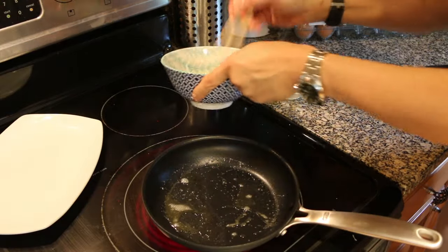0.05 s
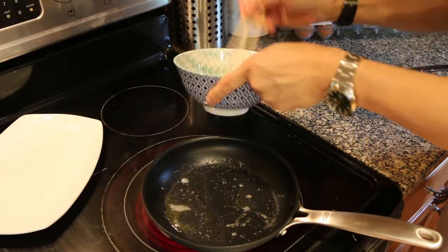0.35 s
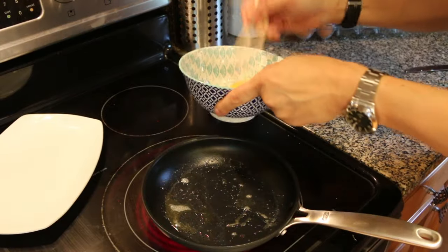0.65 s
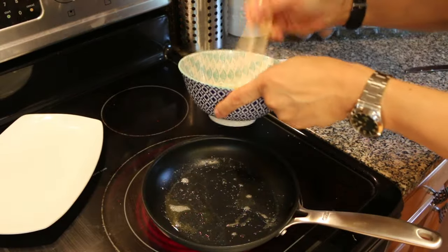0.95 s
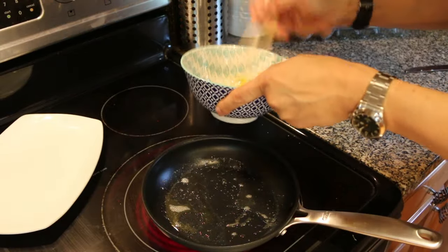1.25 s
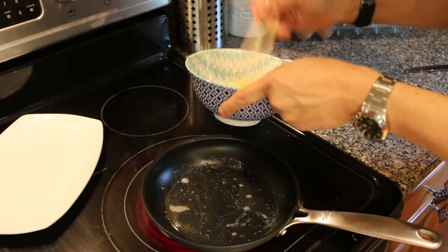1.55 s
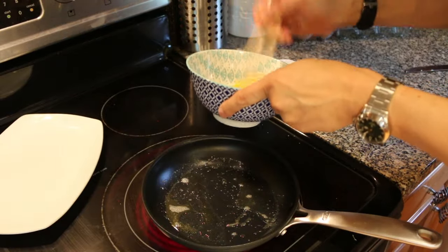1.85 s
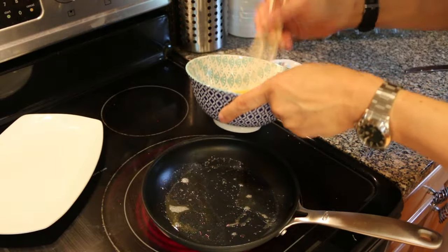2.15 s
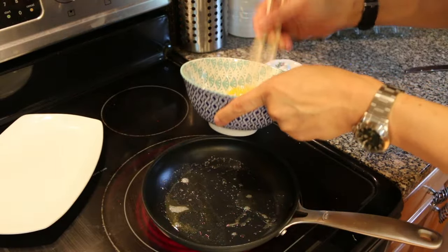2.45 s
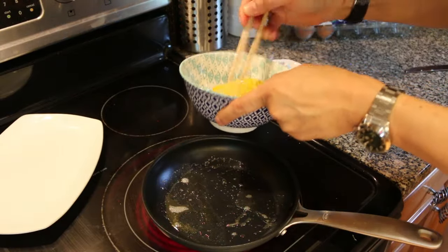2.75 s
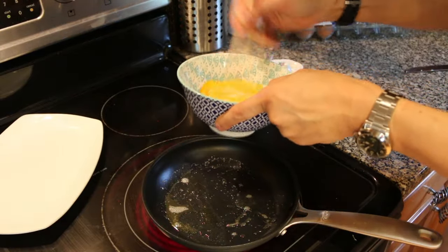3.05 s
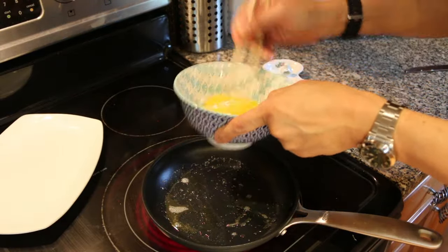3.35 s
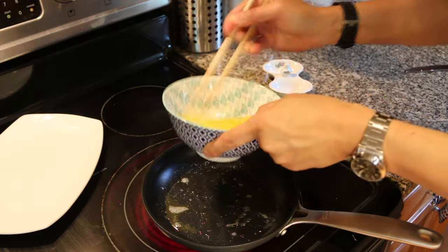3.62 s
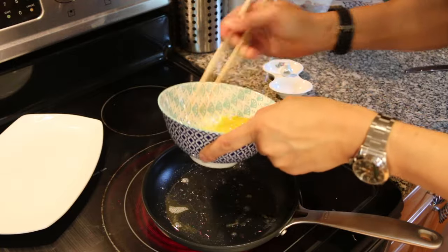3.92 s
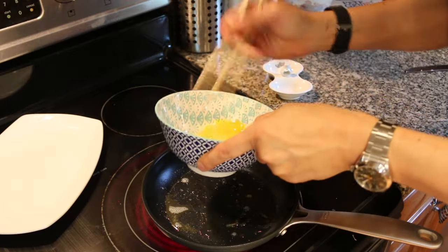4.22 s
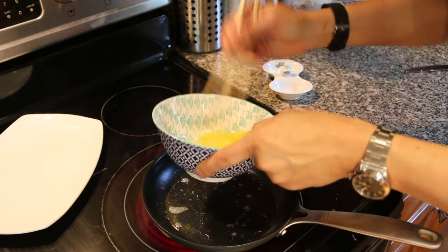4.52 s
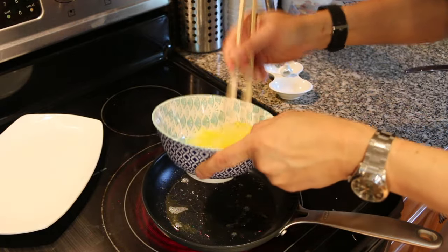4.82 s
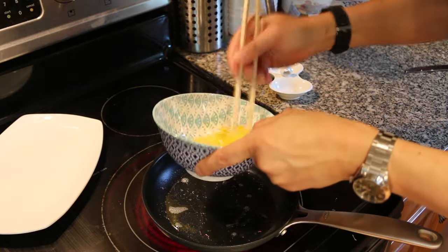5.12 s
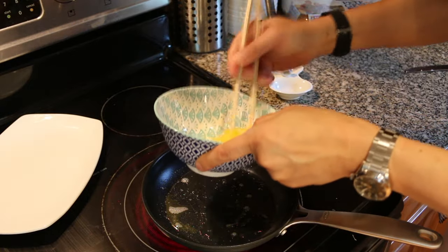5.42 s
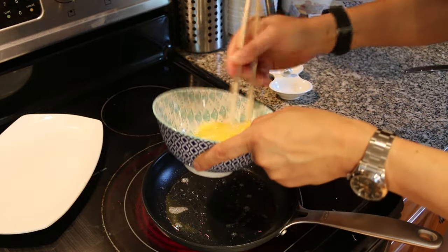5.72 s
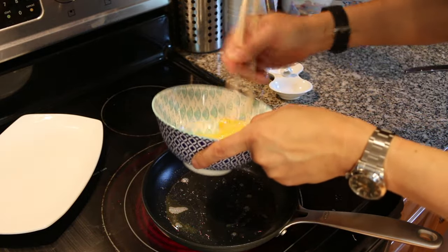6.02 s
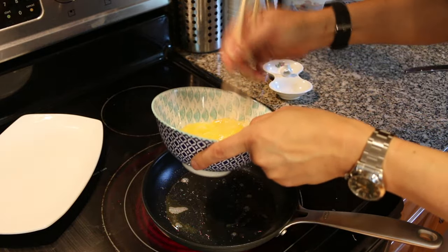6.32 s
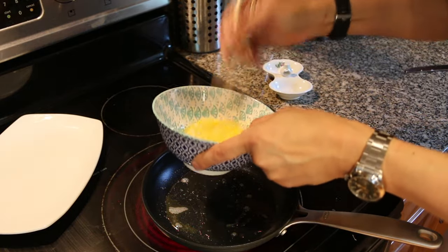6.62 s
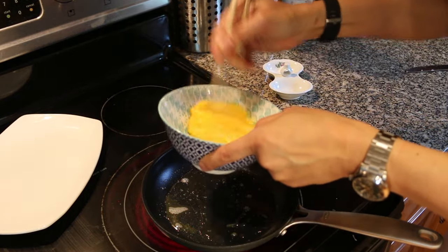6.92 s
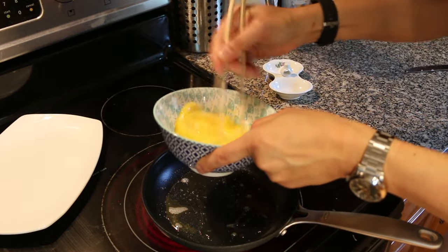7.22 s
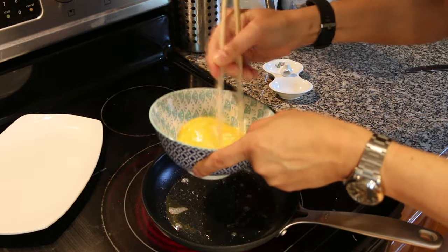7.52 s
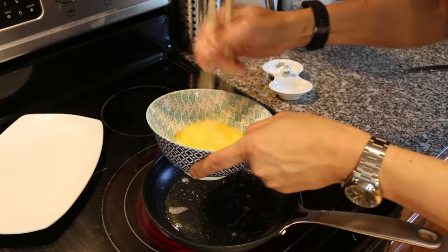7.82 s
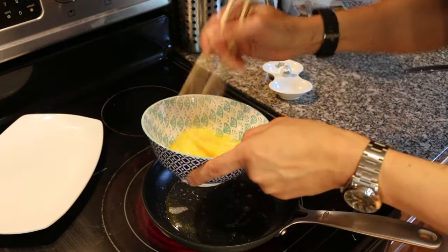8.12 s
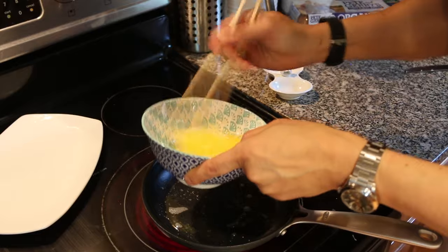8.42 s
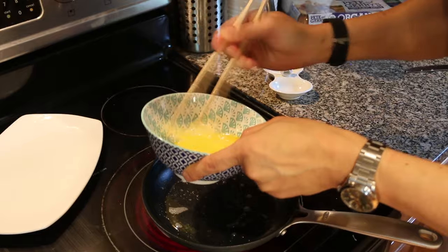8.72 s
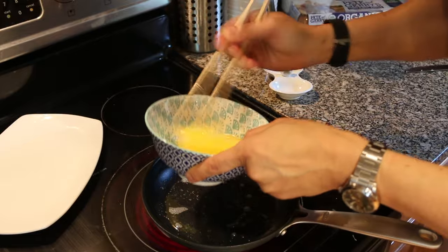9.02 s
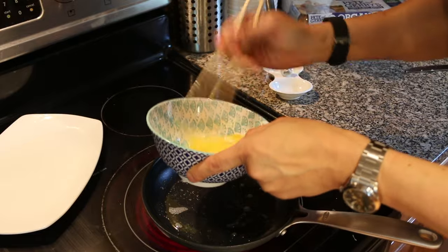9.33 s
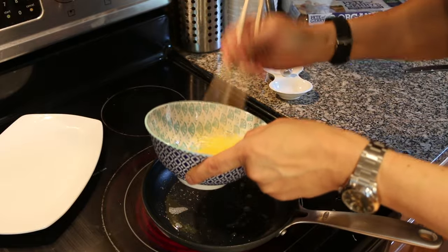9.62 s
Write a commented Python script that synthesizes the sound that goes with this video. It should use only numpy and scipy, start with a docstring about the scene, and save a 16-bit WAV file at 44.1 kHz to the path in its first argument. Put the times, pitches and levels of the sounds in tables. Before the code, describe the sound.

Rapid clacking of chopsticks whisking eggs in a ceramic bowl, easing off twice into softer wet sloshes and scrapes.

```python
"""Beating eggs with chopsticks

Wooden chopsticks beat eggs in a hand-held ceramic bowl over a stove, about 6.5 strokes a second.
Most strokes clack on the bowl and set it ringing; in between, the egg sloshes, air pockets plop,
and now and then the sticks scrape the glaze or click together. Stove and kitchen walls throw
the sound back over a low rush of air, and a limiter rides the clacks."""
import sys
import numpy as np
from scipy import signal
from scipy.fft import rfft, irfft
from scipy.io import wavfile
from scipy.ndimage import uniform_filter1d

SR = 44100
rng = np.random.default_rng(int(sys.argv[2]) if len(sys.argv) > 2 else 0)


def to_wav(sig):
    """Store sig (one row per channel, or 1-D mono) as 16-bit WAV at the path in sys.argv[1].

    Samples outside -1..1 are clipped; the rate is SR.
    """
    pcm = np.clip(np.atleast_2d(sig), -1, 1) * 32767
    pcm = np.round(pcm).astype(np.int16)
    wavfile.write(sys.argv[1], SR, pcm.T)  # frames by channels


N = 434826

# chopsticks hit the bowl: t/s, crack level/dB, bowl ring level/dB, top-edge tilt/(dB per octave)
BOWL_HITS = [(0.0253, -2, -37, -7), (0.1738, 2, -28, -5), (0.32, 4.5, -22, -4), (0.4796, 2.5, -15, 0.5),
             (0.634, 2, -17.5, -6), (0.7775, -1.5, -23, 1.2), (0.9262, 1, -15.5, -5),
             (1.076, -1.2, -19.5, 1.5), (1.2235, 1.5, -15, -8.5), (1.3729, -0.2, -19, -3.3),
             (1.5276, 1.0, -30, -5.5), (1.6283, -14, -26, -6.2), (1.649, -14, -25, -10.1),
             (1.6777, 1.5, -31, -3.5), (1.8305, -1, -22.5, -4.5), (1.9802, -1.7, -20, -5),
             (2.06, -13, -25, -11), (2.139, 2, -19, -5), (2.2917, -2, -13, -3), (2.4436, 2.5, -12, -2),
             (2.593, 4.5, -14, -4), (2.7438, -7, -29, -1.5), (2.8378, -24, -24.5, -24),
             (3.04, -18, -33, 11), (3.105, -16.5, -30, -13), (3.214, -21.5, -26.5, -9.0),
             (3.5572, -1, -20.5, -3), (3.708, 1.8, -16.5, 1), (3.8677, -2.5, -18.5, -1.5),
             (4.0139, -4.2, -21, -3.5), (4.1748, -1, -14, -3), (4.331, 3, -10.5, -2),
             (4.4876, 2, -18.3, 1.5), (4.6471, -3, -22, 1), (4.817, -2.2, -21, -3.4),
             (4.9666, 3, -8.5, -1.2), (5.1212, 2.2, -17.5, 6), (5.2739, 2.3, -14.5, 2),
             (5.433, 1, -12.5, 0.5), (5.5899, 1.5, -14.5, 0.8), (5.7443, 4.5, -10, -0.5),
             (5.8969, -0.8, -15.5, 1), (6.052, 1.3, -13.5, 1), (6.207, 4, -10, 3), (6.3682, 3, -15.4, -4.5),
             (6.5253, -0.3, -7.5, 0), (6.6846, 3, -14, 0), (6.8368, -8, -14.5, -9),
             (7.1152, -16.5, -15.5, -20), (7.287, -18, -24.7, -15), (7.4132, -18, -25.5, -9.8),
             (7.6258, -14, -22, -1), (8.1982, -12.5, -38, 1), (8.3771, -3.9, -18.5, -0.0),
             (8.535, 0.9, -18, -3.5), (8.6855, -3.5, -13.5, -3.5), (8.8263, -3, -18.5, 0),
             (8.985, -0.3, -11, -0.5), (9.1296, 3, -10, 0), (9.2881, 3, -13, -0.5),
             (9.446, 2.2, -11.5, -4.5), (9.599, 5.5, -7.5, -0.5), (9.7573, 1, -13.5, -8)]
# how hard the egg is churned: t/s, low slosh level/dB, wet fizz level/dB
EGG_CHURN = [(0.0, -49, -36), (1.1, -37, -34.5), (2.44, -41.5, -32.5), (3.51, -41, -42.5), (4.03, -34, -38),
             (4.58, -39.5, -37.5), (6.2, -32.5, -43.5), (6.67, -39.5, -33.5), (7.11, -34, -38),
             (7.91, -33, -32.5), (8.27, -39.5, -41), (8.59, -32.5, -39), (8.81, -36, -38),
             (9.86, -34.5, -35.5)]
# tone of wood dragging on wet glaze and of the egg's sticky crackle: f/Hz, level/dB
STICKY_SPECTRUM = [(400, -34), (1500, 2), (3500, 3.5), (7000, 2.5), (9500, -1.5), (13000, -7), (16000, -25)]


def amp(db):
    """Decibels to gain."""
    return 10 ** (np.asarray(db) / 20)


def unit_rms(x):
    """Scales to rms 1."""
    return x / np.sqrt(np.mean(x ** 2) + 1e-20)


def curve_at(points, hz):
    """Reads a curve on a log-frequency axis."""
    f, value = np.transpose(points)
    return np.interp(np.log(hz + 1), np.log(f + 1), value)


def add(mix, s, sound):
    """Mixes a sound in at time s."""
    part = mix[max(round(s * SR), 0):][:len(sound)]
    part += sound[:len(part)]


def decay(t, t60):
    """Exponential decay, 60 dB down after t60."""
    return np.exp(-np.log(1000) * t / np.maximum(t60, 1e-4))


def colour(x, spectrum, size=2048):
    """Minimum-phase EQ of unit energy with the given spectrum."""
    log_gain = np.log(amp(curve_at(spectrum, abs(np.fft.fftfreq(size, 1 / SR)))))
    taps = np.fft.ifft(np.exp(np.conj(signal.hilbert(log_gain)))).real[:size // 2]
    return signal.fftconvolve(x, taps / np.linalg.norm(taps))[:len(x)]


def air(level_db=-48):
    """Room tone: the steady low rush of the kitchen."""
    # the quiet kitchen: f/Hz, level/dB
    air_spectrum = [(15, -3.5), (40, -2), (70, -7), (130, -10), (300, -10.5), (600, -12.5), (1500, -63),
                    (5000, -21.5), (16000, -30.5)]
    gain = amp(curve_at(air_spectrum, np.fft.rfftfreq(N, 1 / SR)))
    return amp(level_db) * unit_rms(irfft(rfft(rng.standard_normal(N)) * gain, N))


def room_tail(build_s=0.0009, far_wall_s=0.08, far_wall_gain=0.68, far_wall_width_s=0.025):
    """Diffuse ring of the kitchen, with a second swell from the far wall."""
    # tone of the reverb: f/Hz, level/dB
    tail_spectrum = [(200, 8), (800, 5.5), (2000, 7.5), (4000, -0.5), (7500, -3.5), (9500, -4),
                     (16000, -5.5)]
    # decay of the reverb: f/Hz, t60/s
    tail_t60 = [(200, 0.77), (1500, 0.24), (6000, 0.37), (10000, 0.3), (16000, 0.22)]
    hz, t, bands = signal.stft(rng.standard_normal(SR // 2), SR, nperseg=256)
    far_wall = far_wall_gain * np.exp(-((t - far_wall_s) / far_wall_width_s) ** 2)
    swell = 1 - np.exp(-t / build_s) + far_wall
    tone = amp(curve_at(tail_spectrum, hz))[:, None]
    fade = decay(t, curve_at(tail_t60, hz)[:, None])
    tail = signal.istft(bands * tone * fade * swell, SR, nperseg=256)[1]
    return tail / np.linalg.norm(tail)


def kitchen(x, near_db=-0.5, near_hz=3200, tail_db=-6, sway_s=0.00022, tails=3):
    """Dull early echoes, then the room rings on. The paths shift as the bowl sways."""
    # echoes off the stove top, its back panel and the wall: delay/s, gain
    echoes = [(.0014, 1), (.0037, 0.48), (.0051, 0.74), (.0073, 0.13), (.0078, 0.11), (.0084, 0.32),
              (0.0104, -0.21), (0.0141, -0.38)]
    t = np.arange(N) / SR
    dull = signal.lfilter(*signal.butter(1, near_hz, fs=SR), x)
    knots = np.arange(0, t[-1] + 1, 1 / 4)
    near, tail = np.zeros((2, N))
    for delay, gain in echoes:
        sway = sway_s * np.interp(t, knots, rng.standard_normal(len(knots)))
        near += gain * np.interp(t - delay - sway, t, dull)
    for k in range(tails):
        crossfade = np.sqrt(2 / tails) * np.cos(np.pi * (2 * t + k / tails))
        tail += signal.fftconvolve(x * crossfade, room_tail())[:N]
    return x + amp(near_db) * near + amp(tail_db) * tail


def nook(x, level_db=-1.0, width_hz=9.6):
    """The tight space between bowl, pan and stove sings on at a few pitches."""
    # its narrow resonances: f/Hz, level/dB
    resonances = [(812, -15.5), (857, 2), (1031, 4), (1190, 5.5), (1298, -27), (1339, -22.5), (1555, -6),
                  (1940, -42), (2121, -7), (2728, 3)]
    return x + sum(amp(db + level_db) * signal.lfilter(*signal.iirpeak(hz, hz / width_hz, fs=SR), x)
                   for hz, db in resonances)


def bubble(hz, t60, glide, swell_cycles=0.7):
    """An air pocket swells into a note that bends as it nears the surface."""
    t = np.arange(SR // 8) / SR
    pitch = hz * (1 + glide * (1 - np.exp(-t / 0.034)))
    attack = 1 - np.exp(-t * hz / swell_cycles)
    return np.sin(2 * np.pi * np.cumsum(pitch) / SR) * decay(t, t60) * attack


def froth(spectrum, per_s, cycles, spread_db, pitches=44):
    """A crowd of tiny, heavily damped bubbles of all sizes."""
    notes = []
    for hz in np.geomspace(350, 9000, pitches):
        note = bubble(hz, t60=cycles / hz, glide=0.042 * rng.standard_normal())
        notes.append(amp(curve_at(spectrum, hz)) * hz * note[:SR // 20])
    gains = amp(spread_db * np.minimum(rng.exponential(1, N), 3))
    out, pick = np.zeros(N), rng.integers(0, pitches, N)
    for at in np.flatnonzero(rng.random(N) < per_s / SR):
        add(out, at / SR, gains[at] * notes[pick[at]])
    return unit_rms(out)


def sticky_crackle(per_s=120, spread_db=5):
    """Threads and films of egg white snap."""
    snaps = amp(spread_db * np.minimum(rng.exponential(1, N), 3)) * rng.choice([-1, 1], N)
    return unit_rms(colour(snaps * (rng.random(N) < per_s / SR), STICKY_SPECTRUM))


def slosh(slosh_db=-6, fizz_db=-9, sticky_db=-4, full_stroke_db=-10, swing_db=3, swing_hz=7.24):
    """On each stroke the sticks swish through the egg, and the egg flops back a moment later."""
    # low body of the moving egg: f/Hz, level/dB
    slosh_spectrum = [(150, -44), (400, -8.5), (650, -14.5), (850, -2), (1300, 2), (2000, -4.5),
                      (3500, -9.5), (9000, -26)]
    # wet fizz of its finest bubbles: f/Hz, level/dB
    fizz_spectrum = [(500, -44), (1400, -24), (2100, -0.5), (3000, -11.5), (4200, -9), (5500, -7.5),
                     (8000, -12), (10000, -23)]
    t = np.arange(N) / SR
    strokes = np.array([s for s, db, *_ in BOWL_HITS if db > full_stroke_db])
    since_stroke = t - strokes[np.maximum(np.searchsorted(strokes, t) - 1, 0)]
    churn_s, low_db, wet_db = np.transpose(EGG_CHURN)

    def surge(churn_db, lag_s):
        """The level swings to and fro, restarting at each full stroke."""
        swing = swing_db * np.cos(2 * np.pi * swing_hz * (since_stroke - lag_s))
        return amp(np.interp(t, churn_s, churn_db) + swing)

    fizz = froth(fizz_spectrum, per_s=5000, cycles=20, spread_db=2.5)
    swish = surge(wet_db + fizz_db, lag_s=0.019) * (fizz + amp(sticky_db) * sticky_crackle())
    body = froth(slosh_spectrum, per_s=1300, cycles=22, spread_db=5.5)
    flop = surge(low_db + slosh_db, lag_s=0.077) * body
    return swish + flop


def plop(hz, smack_db=-8, smack_t60=0.038, film_db=-9, film_t60=0.0098,
         satellites=5, satellite_db=-9, scatter=0.2, lag_s=0.018):
    """The sticks tear a pocket open: a tick of film, a wet smack, its note, a few trailing bubbles."""
    t60 = 0.055 / (hz / 1000) ** 0.69  # larger, lower pockets ring longer
    note = bubble(hz, t60, glide=0.017 + 0.02 * rng.standard_normal(), swell_cycles=1.48)
    t = np.arange(len(note)) / SR
    tear = rng.standard_normal(len(t)) * decay(t, smack_t60) * (1 - np.exp(-t / 0.0013))
    smack = colour(tear, [(hz / 3, -32), (hz, 0), (hz * 1.42, -6), (hz * 4, -22), (hz * 12, -40)])
    tick = colour(tear[:2048] * decay(t[:2048], film_t60), STICKY_SPECTRUM)
    sound = note + amp(smack_db) * smack
    add(sound, 0, amp(film_db) * tick)
    for offset, lag in zip(rng.standard_normal(satellites), rng.random(satellites)):
        satellite_hz = hz * np.exp(scatter * (offset + 0.5))  # mostly smaller, so higher
        add(sound, lag * lag_s, amp(satellite_db) * bubble(satellite_hz, t60 / 2, glide=0.093))
    return sound


def small_plops(level_db=4, spread_db=3, low_hz=1500, high_hz=5000, first_s=0.022, window_s=0.09):
    """Two lesser pockets burst at random after each hit, as loud as the egg is frothy."""
    out = np.zeros(N)
    churn_s, _, wet_db = np.transpose(EGG_CHURN)
    for s, *_ in BOWL_HITS:
        for when, pitch, strength in rng.random((2, 3)):
            db = level_db + np.interp(s, churn_s, wet_db) + spread_db * (2 * strength - 1)
            hz = low_hz * (high_hz / low_hz) ** pitch
            add(out, s + first_s + window_s * when, amp(db) * plop(hz))
    return out


def large_plops(level_db=4):
    """The largest air pockets plop out above the slosh."""
    # pockets opening in the egg: t/s, f/Hz, level/dB
    pockets = [(0.178, 710, -25), (0.25, 1610, -26), (0.396, 1910, -19), (0.4, 3490, -19.5),
               (0.545, 4650, -19.5), (0.664, 793, -28), (0.83, 710, -29), (0.925, 1500, -21.5),
               (1.016, 3160, -13.5), (1.087, 1475, -14.5), (1.177, 1040, -25.5), (1.303, 1840, -21),
               (1.316, 3230, -21), (1.451, 1300, -24.5), (1.485, 4000, -21.5), (1.543, 864, -21.5),
               (1.548, 1375, -19.5), (1.611, 980, -21.5), (1.633, 2215, -17.5), (1.849, 1377, -20.5),
               (1.981, 1750, -18), (2.064, 3300, -15.5), (2.142, 2990, -11), (2.286, 1040, -25),
               (2.402, 827, -26), (2.41, 1230, -20), (2.594, 1426, -14.5), (2.669, 2360, -15),
               (2.745, 1520, -17.5), (3.02, 2005, -25), (3.086, 2140, -26), (3.158, 827, -28),
               (3.272, 743, -27.5), (3.728, 1550, -19), (3.77, 1490, -20), (3.77, 1164, -17.5),
               (3.908, 550, -35.5), (4.038, 868, -28.5), (4.037, 1473, -12.5), (4.176, 1222, -20.5),
               (4.381, 610, -34), (4.571, 1790, -13), (4.916, 1820, -22), (4.923, 1100, -27),
               (5.121, 1158, -10.5), (5.276, 1527, -14), (5.485, 576, -33), (6.094, 532, -34.5),
               (6.137, 833, -19), (6.137, 1176, -19), (6.207, 1310, -16), (6.759, 2290, -20.5),
               (6.838, 1210, -20.5), (6.967, 1003, -22), (7.126, 1480, -20), (7.344, 1280, -23),
               (7.196, 4300, -28.5), (7.396, 3220, -27), (7.44, 4280, -26), (7.509, 902, -21),
               (7.787, 1066, -21), (7.891, 3750, -25.5), (8.022, 860, -21), (8.146, 1107, -23),
               (8.385, 1990, -15), (8.455, 1500, -23), (8.637, 4550, -13), (8.861, 1093, -22.5),
               (8.873, 524, -32.5), (8.993, 1128, -14.5), (9.289, 1700, -18), (9.292, 1013, -19.5),
               (9.446, 1690, -16.5), (9.492, 475, -32.5), (9.6, 1826, -11.5), (9.683, 962, -17.5)]
    out = np.zeros(N)
    for s, hz, db in pockets:
        add(out, s, amp(db + level_db) * plop(hz))
    return out


def scrapes(rise_s=0.00073, slips_per_s=2500, grit_db=-8):
    """Tiny slips of wood on glaze run together into a short rasp."""
    # the sticks drag along the wet glaze: t/s, level/dB, t60/s
    drags = [(2.858, -36, 0.073), (3.042, -21.5, 0.034), (3.091, -34.5, 0.59), (3.145, -23, 0.058),
             (3.398, -16.5, 0.042), (6.973, -25.5, 0.079), (7.047, -22, 0.087), (7.12, -23, 0.093),
             (7.489, -25.5, 0.049), (8.29, -29.5, 0.06), (8.376, -17, 0.041)]
    out, t = np.zeros(N), np.arange(SR // 6) / SR
    for s, db, t60 in drags:
        slips = unit_rms(rng.standard_normal(len(t)) * (rng.random(len(t)) < slips_per_s / SR))
        rasp = slips + amp(grit_db) * rng.standard_normal(len(t))
        envelope = decay(t, t60) * (1 - np.exp(-t / rise_s))
        add(out, s, amp(db) * colour(rasp * envelope, STICKY_SPECTRUM))
    return out


def dry_burst(envelope):
    """Noise with an evened-out spectrum under the envelope: a dry click with no pitch."""
    burst = envelope * rng.standard_normal(len(envelope))
    flat = irfft(np.exp(1j * np.angle(rfft(burst))), len(burst))
    local_rms = np.sqrt(abs(uniform_filter1d(flat ** 2, size=40)) + 1e-18)
    return envelope * flat / local_rms


def clicks(note_t60=0.01, snap_db=-4, snap_t60=0.022):
    """Wood on wood: a dry snap and one very short note."""
    # the sticks meet clear of the bowl: t/s, f/Hz, level/dB
    touches = [(1.011, 4400, -17), (2.944, 4760, -24), (3.253, 6000, -17.5), (3.3931, 5460, -7.5),
               (4.246, 5100, -15.5), (7.044, 6700, -9.5), (8.2324, 5400, -12.5), (8.607, 5580, -20)]
    out, t = np.zeros(N), np.arange(2048) / SR
    for s, hz, db in touches:
        spectrum = [(hz / 8, -22), (hz / 2, -10), (hz, 0), (hz * 2, -9), (hz * 4, -24)]
        snap = colour(dry_burst(decay(t, snap_t60)), spectrum)
        note = np.sin(2 * np.pi * hz * t) * decay(t, note_t60)
        add(out, s, amp(db) * (amp(snap_db) * snap + note))
    return out


def stick_ring(t, grip, detune=0.0439):
    """The two sticks sound brief notes that shift with the grip."""
    # modes of the sticks: f/Hz, level/dB, t60/s
    stick_modes = [(5424, 4.5, 0.014), (6820, -4.5, 0.055)]
    return sum(amp(db) * np.sin(2 * np.pi * hz * (1 + detune * grip) * t) * decay(t, t60)
               for hz, db, t60 in stick_modes)


def bowl_ring(t, spread_db=3.5, detune=0.016, contact_s=0.0016):
    """Each spot on the bowl's wall drives its modes differently, and the moving egg detunes them."""
    # modes of the bowl, damped by hand and egg: f/Hz, level/dB, t60/s
    bowl_modes = [(737, -23, 0.017), (848, -19.5, 0.078), (1063, -12.5, 0.065), (1342, -12.5, 0.11),
                  (1600, -5.5, 0.043), (1800, -0.5, 0.024), (1985, 1, 0.036), (2175, 2, 0.028),
                  (2378, 3, 0.017), (2675, 5.5, 0.017), (2963, -1.5, 0.021), (3930, -11, 0.049)]
    hz, db, t60 = np.transpose(bowl_modes)[:, :, None]
    spot, load, phase = rng.standard_normal((3, len(bowl_modes), 1))
    tones = np.sin(2 * np.pi * (hz * (1 + detune * load) * t + phase))
    modes = amp(db + spread_db * spot) * decay(t, t60) * tones
    return modes.sum(0) * (1 - np.exp(-t / contact_s))


def clacks(crack_db=-5, stick_db=-18, ring_db=-3, snap_t60=0.012, chatter_db=-14, chatter_t60=0.06,
           edge_hz=6500, edge_offset_db=-1, note_trade=0.56, second_db=-9, second_lag_s=0.005):
    """A sharp crack chatters as the sticks skid, the bowl rings, the second stick lands just after."""
    # wood striking glaze: f/Hz, level/dB
    crack_spectrum = [(150, -37.5), (400, -24.5), (700, -9.5), (1500, -11), (3300, -4), (4400, -3.5),
                      (5500, 2.5), (6300, 0), (7100, 1.5), (8800, 0.5), (9500, -2.5), (12500, -1),
                      (16000, -14)]
    out, t = np.zeros(N), np.arange(4096) / SR
    chatter = amp(chatter_db) * decay(t, chatter_t60)
    contact = (decay(t, snap_t60) + chatter) * (1 - np.exp(-t / 0.0001))
    hand = rng.standard_normal((len(BOWL_HITS), 2))
    for (s, db, bowl_db, edge_db), (grip, late) in zip(BOWL_HITS, hand):
        # a harder contact has more top edge
        spectrum = [(hz, level + (edge_db + edge_offset_db) * np.clip(np.log2(hz / edge_hz), 0, 1))
                    for hz, level in crack_spectrum]
        crack = amp(crack_db) * colour(dry_burst(contact), spectrum)
        # a duller, squarer blow puts more into the notes of the sticks
        sticks = amp(stick_db - note_trade * edge_db) * stick_ring(t, grip)
        add(out, s, amp(db) * (crack + sticks) + amp(bowl_db + ring_db) * bowl_ring(t))
        second_crack = amp(crack_db + second_db) * colour(dry_burst(contact), spectrum)
        add(out, s + second_lag_s * abs(late), amp(db) * second_crack)
    return out


def scene():
    """Everything in the bowl sounds through the nook into the kitchen, in mono."""
    bowl = clacks() + clicks() + scrapes() + large_plops() + small_plops() + slosh()
    return (kitchen(nook(bowl)) + air())[None]


def record(dry, threshold_db=-2, hold_fall_db_per_s=70, depth=0.56, lowpass_hz=16200):
    """A limiter ducks on loud clacks and recovers; peaks clip; a low-pass trims the very top."""
    peak_db = 20 * np.log10(abs(dry[0]) + 1e-9)
    fall_db = np.arange(N) * hold_fall_db_per_s / SR
    held_db = np.maximum.accumulate(peak_db + fall_db) - fall_db
    duck_db = depth * uniform_filter1d(np.maximum(held_db - threshold_db, 0), size=30)
    limited = np.clip(dry / amp(duck_db), -1, 1)
    lowpass = signal.firwin(255, lowpass_hz, window=("kaiser", 7), fs=SR)
    return signal.oaconvolve(limited, lowpass[None], "same")


dry = scene()
out = record(dry)
to_wav(out)
```